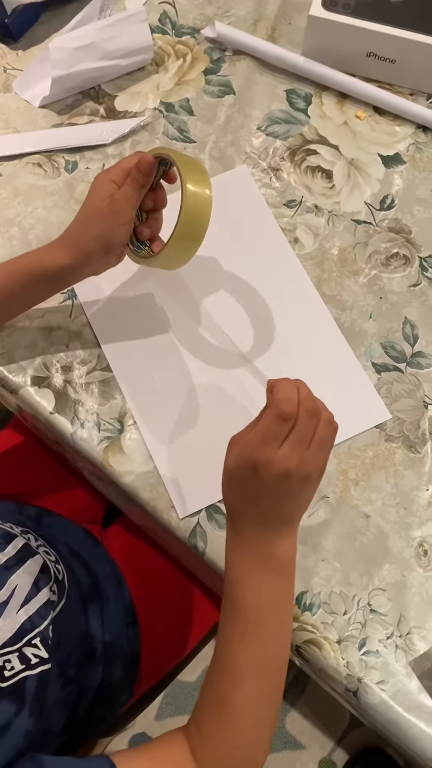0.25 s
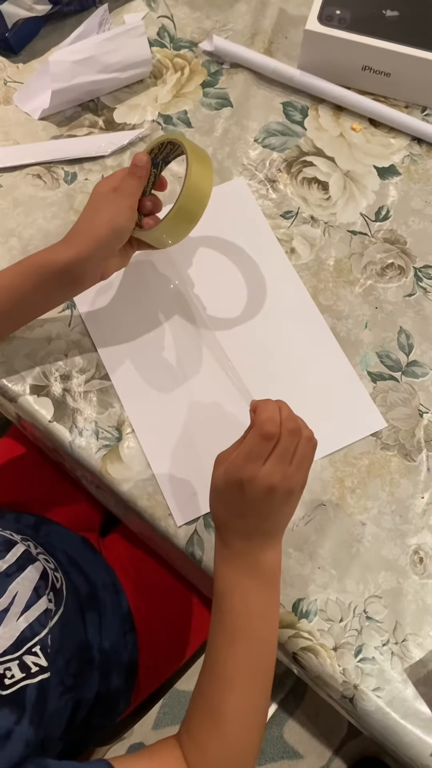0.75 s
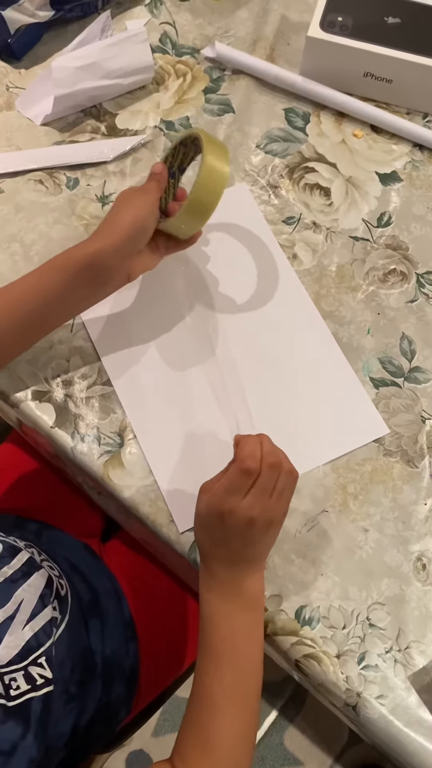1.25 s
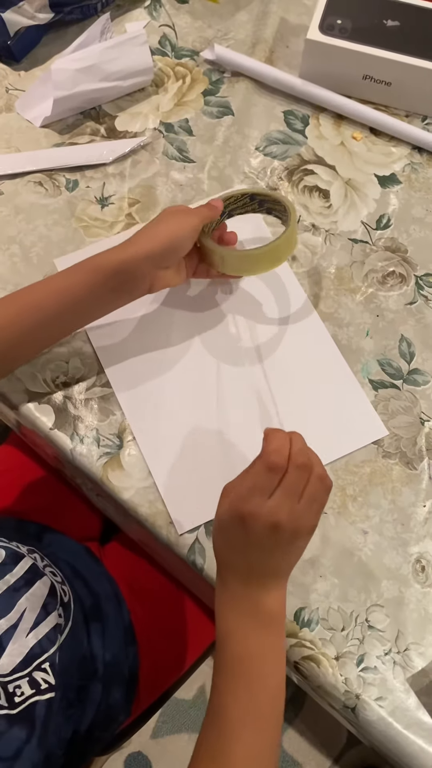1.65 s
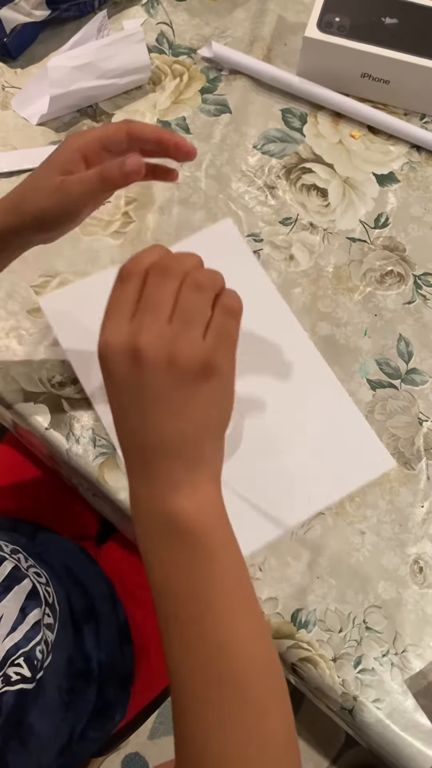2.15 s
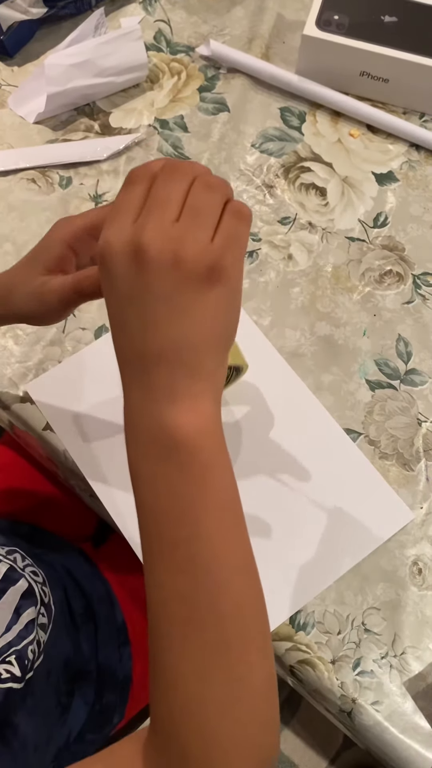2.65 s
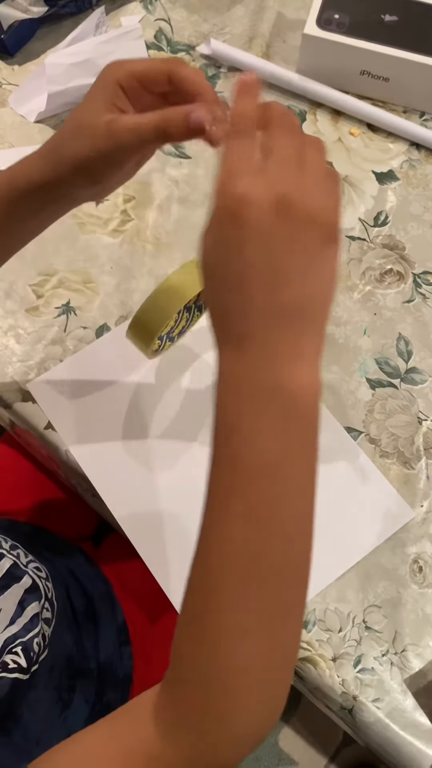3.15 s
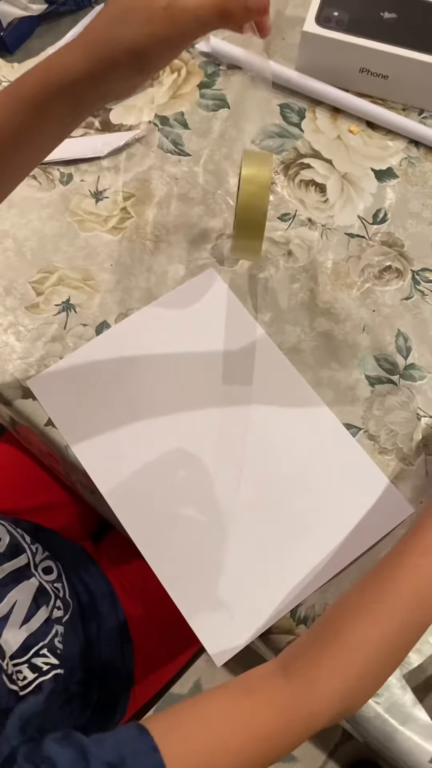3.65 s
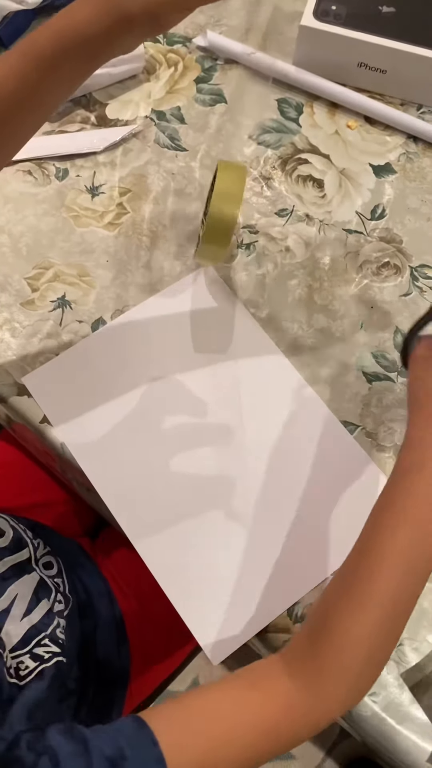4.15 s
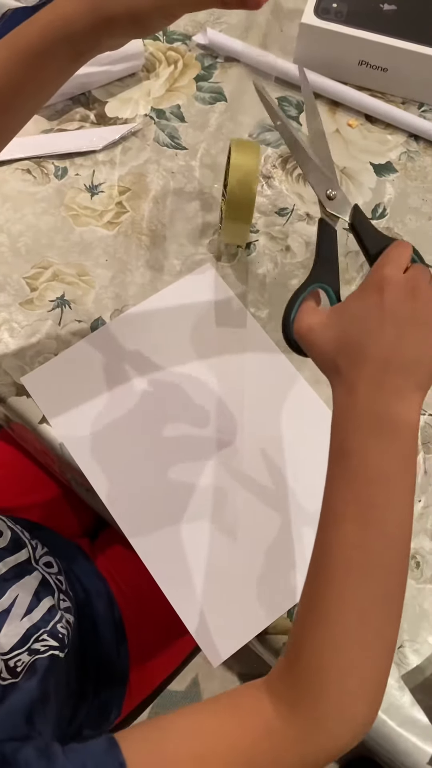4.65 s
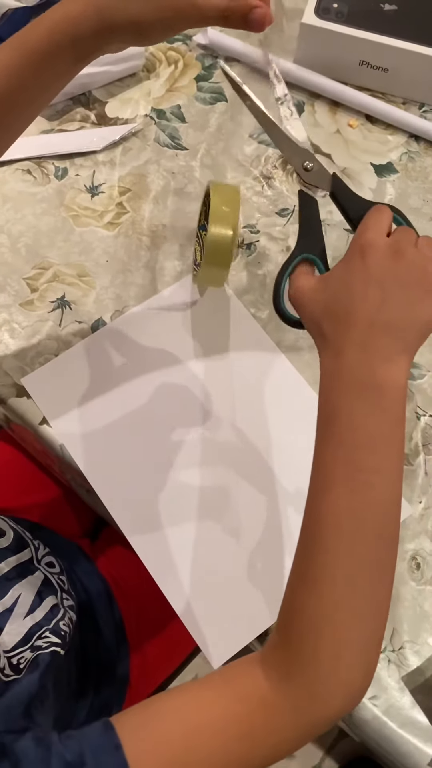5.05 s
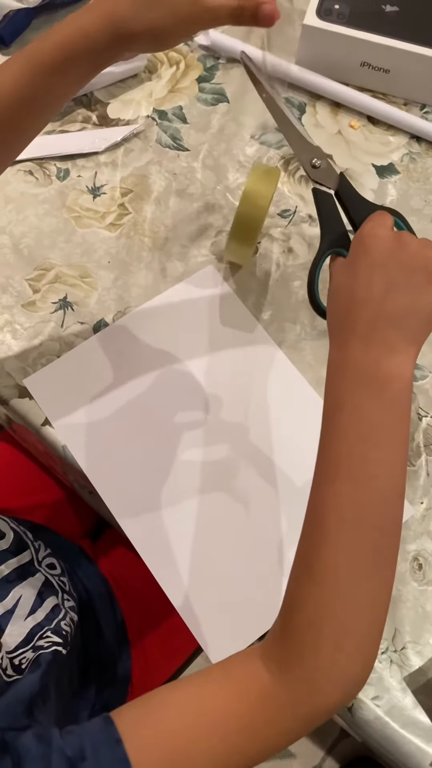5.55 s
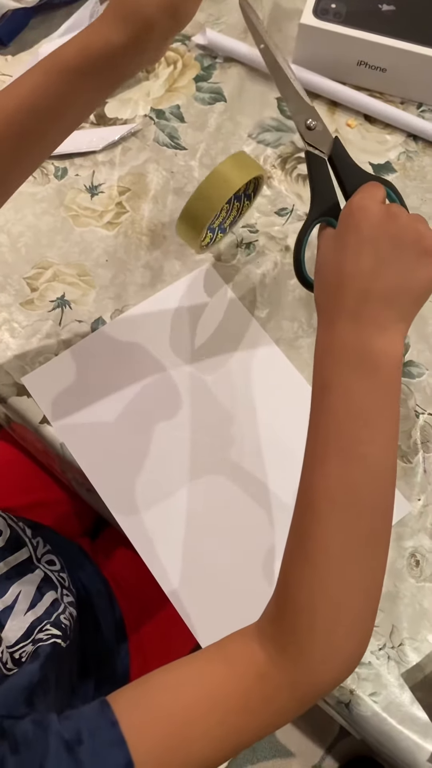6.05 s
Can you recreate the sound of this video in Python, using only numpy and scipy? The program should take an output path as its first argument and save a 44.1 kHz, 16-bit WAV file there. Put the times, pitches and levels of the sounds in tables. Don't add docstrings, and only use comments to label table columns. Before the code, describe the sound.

In a small quiet indoor room, heard close by a stereo phone, sticky tape is ripped from its cardboard roll. From 0 to 0.25 seconds the glue lets go in a dense stutter of very loud, dry, bright snaps with a slight hollow core knock. Separate jerks follow near 0.33, 0.44, 0.65 and 0.83, with a last strong group at 1.07-1.17 and tiny film crackles between. Everything then drops far quieter: soft rustling, a crisp tick at 1.63, and the roll knocking dully on the table at 2.0-2.1. Hands and paper rub gently until 3.5, with small ticks and a firmer woody knock at 3.59. A near-quiet stretch holds faint ticks and a brush at 4.4. Scissor clicks and short scuffs gather at 4.9-5.6, sharpest near 5.3 and 5.57, and one clear tick ends it at 6.24. A faint low drone wavers underneath.

```python
import sys
import numpy as np
from scipy import signal
from scipy.fft import rfft, irfft, next_fast_len
from scipy.io import wavfile
from scipy.ndimage import uniform_filter1d, map_coordinates

SR = 44100
rng = np.random.default_rng(int(sys.argv[2]) if len(sys.argv) > 2 else 0)


def wav_out(sig):
    wavfile.write(sys.argv[1], SR, np.round(np.clip(np.atleast_2d(sig).T, -1, 1) * 32767).astype(np.int16))


def ratio_of_db(decibels):
    return 10 ** (np.asarray(decibels, float) / 20)


N = 277389
TIME = np.arange(N) / SR
PAD = SR // 4


def unit(x):
    return x / np.sqrt(np.mean(x ** 2) + 1e-20)


def along(points, hz):
    f, v = np.transpose(points)
    return np.interp(np.log(hz + 1), np.log(f + 1), v)


def above(f, edge_hz):
    return 1 / (1 + (edge_hz / (f + 1)) ** 40)


def below(f, edge_hz, steepness=40):
    return 1 / (1 + (f / edge_hz) ** steepness)


def wobble(rate):
    knots = rng.standard_normal(int(N * rate / SR) + 4)
    return map_coordinates(knots, [np.arange(N) * rate / SR])


def filtered(x, response):
    m = next_fast_len(x.shape[-1] + SR // 8)
    spectrum = rfft(x, m) * response(np.fft.rfftfreq(m, 1 / SR))
    return irfft(spectrum, m)[..., :x.shape[-1]]


def modes(table):
    def response(f):
        total = 0
        for k, (c, w, db) in enumerate(table):
            total = total + (-1) ** k * ratio_of_db(db) * 1j * f * w / (c * c - f * f + 1j * f * w)
        return total
    return response


def noise(response):
    return unit(filtered(rng.standard_normal((2, N)), response))


def evened(burst):
    z = rfft(burst)
    smooth = np.sqrt(uniform_filter1d(np.abs(z) ** 2, size=15) + 1e-20)
    flat = irfft(z / np.sqrt(smooth), len(burst)) * (np.arange(len(burst)) < 2000)
    return flat * np.linalg.norm(burst) / np.linalg.norm(flat)


def bursts(times, peak_db, length_ms, rise_ms, spiky_db):
    out = np.zeros(N + 2 * PAD)
    t_ms = np.arange(2500) / SR * 1000
    snaps = rng.standard_normal((len(times), 2, len(t_ms)))
    for s, db, ms, (sign, size) in zip(times, peak_db, length_ms, snaps):
        shape = (1 - np.exp(-(t_ms / rise_ms) ** 2)) * np.exp(-t_ms / max(ms, .2))
        grains = unit(sign * ratio_of_db(spiky_db * size))
        out[PAD + round(s * SR):][:len(t_ms)] += ratio_of_db(db) * evened(shape * grains)
    return out


def through(s, db, hz, width, ms, rise_ms):
    t = np.arange(2200) / SR
    out = bursts([s], [db], [ms], rise_ms, spiky_db=2.5)
    start = PAD + round(s * SR)
    ring = t * np.exp(-1.5 * np.pi * width * t) * np.cos(2 * np.pi * hz * t)
    out[start:start + 4699] = np.convolve(out[start:start + 2500], ring / np.linalg.norm(ring))
    return out


# hz, density_db (per Hz)
TONE_COLOUR = [(15, -42), (25, -14), (98, -5), (170, -8), (390, -15), (640, -25), (2500, -47.5),
               (4200, -110)]
# time_s, level_db
TONE_LEVEL = [(0, -55.5), (.4, -59), (1.05, -63), (1.5, -68.5), (2.07, -65), (2.4, -66.5), (3.9, -65.5),
              (4.15, -69.5), (5.3, -65), (5.7, -69), (6.29, -67)]
# hz, width_hz, level_db
HUM = [(96, 6, -3.5), (145, 4, -1)]
# centre_s, half_width_s, level_db
DRONE_SWELLS = [
    (0.1, 0.27, -62),
    (1.68, 0.087, -62),
    (1.85, 0.085, -62.5),
    (2.04, .12, -59.5),
    (3.41, .08, -62.5),
    (3.9, 0.2, -70),
    (4.65, .15, -71.5),
    (5.39, .06, -69),
]


def background():
    swell = ratio_of_db(-77 + 3.4 * wobble(6))
    for s, half, db in DRONE_SWELLS:
        swell = swell + ratio_of_db(db) * np.exp(-((TIME - s) / half) ** 2)
    drone_hz, wander_rad = 56.7, 1.3
    drone = swell * np.sqrt(2) * np.sin(2 * np.pi * drone_hz * TIME + wander_rad * wobble(4.4))
    tone_db = np.interp(TIME, *np.transpose(TONE_LEVEL)) + 1
    tone = ratio_of_db(tone_db + 1.5 * wobble(5)) * noise(lambda f: ratio_of_db(along(TONE_COLOUR, f)))
    hum = ratio_of_db(-71.0) * noise(modes(HUM))
    hiss = ratio_of_db(-89.5) * noise(lambda f: (f > 900) * below(f, 12800))
    return drone + tone + hum + hiss


# hz, t60_s
REVERB_TIME = [(150, .55), (400, 0.66), (1000, 0.45), (3000, 0.54), (6000, 0.31), (9500, 0.24),
               (12500, 0.33), (16000, 0.75)]


def room(x):
    out, step = np.zeros((2, len(x) + SR)), SR // 8
    for start in range(0, len(x), step):
        piece = x[start:start + step]
        hz, t, z = signal.stft(rng.standard_normal((2, SR // 2)), SR, nperseg=256)
        late = ratio_of_db(-60 * t / along(REVERB_TIME, hz)[:, None])
        early = 2.2 * ratio_of_db(-60 * t / .05)
        tail = signal.istft(z * (late + early), SR, nperseg=256)[1]
        answer = signal.fftconvolve(piece[None], tail / np.linalg.norm(tail[0]), axes=1)
        out[:, start + 130:][:, :answer.shape[1]] += answer
        scatter = rng.standard_normal(200) * ratio_of_db(-60 * np.arange(200) / SR / .004)
        scatter = np.pad(scatter / np.linalg.norm(scatter), (0, tail.shape[1] - 200))
        out[1, start:][:answer.shape[1]] += ratio_of_db(1.5) * signal.fftconvolve(piece, scatter)
    return out[:, PAD:PAD + N]


# start_s, hold_s, level_db, brightness_db
SLIDING_STROKES = [(1.28, 0.083, -65.5, -10), (1.417, .14, -69, -6), (1.723, 0.33, -72, -7),
                   (2.016, 0.14, -64.5, 1.5), (2.2, 0.1, -66.5, -2), (2.508, 0.098, -65.5, -7.5),
                   (2.66, 0.36, -70.5, -6.5), (2.996, 0.21, -67, -13.5), (3.243, 0.14, -70.5, -4),
                   (3.383, 0.18, -68.5, -10.5), (3.78, 0.19, -82, -2.5), (4.299, 0.31, -84, -1.5),
                   (4.8, .08, -92.5, -4), (4.906, 0.11, -73.5, 5), (5.047, 0.051, -67.5, -12.5),
                   (5.18, 0.027, -72, 4), (5.258, 0.071, -67, -11), (5.5, 0.21, -86.5, -2.5)]


def strokes():
    attack_s, release_db_per_s = 0.016, 125
    still_rub_db, still_hiss_db = -94.5, -104
    start, hold, db, bright_db = np.transpose(SLIDING_STROKES)[..., None]
    knots = np.arange(0, N, 64)
    t = knots / SR - start
    shape = np.clip(t / attack_s, 0, 1) * ratio_of_db(-release_db_per_s * np.clip(t - hold, 0, None))
    gains = []
    for level, still in ((db, still_rub_db), (db + bright_db, still_hiss_db)):
        power = np.sum((shape * ratio_of_db(level)) ** 2, axis=0) + ratio_of_db(2 * still)
        gains.append(np.interp(np.arange(N), knots, np.sqrt(power)))
    return gains


def patchy(x, depth_db):
    z = signal.stft(x, nperseg=512)[2]
    field = uniform_filter1d(rng.standard_normal(z.shape[1:]), size=8, axis=0)
    field = uniform_filter1d(field, size=14, axis=1)
    return signal.istft(z * ratio_of_db(depth_db * unit(field) - 1.5), nperseg=512)[1][:, :N]


# hz, density_db (per Hz)
RUB_COLOUR = [(300, -25), (800, -6), (1500, -5), (2300, -3), (3400, 0), (6000, -1), (8000, -8),
              (12000, -30)]
# hz, density_db (per Hz)
HISS_COLOUR = [(3000, -30), (5500, -4.5), (7500, -1.5), (10000, -6.5), (12500, -4), (14000, -7),
               (15500, -7), (16500, -20)]


def rustle():
    rub_gain, hiss_gain = strokes()
    grain = ratio_of_db(0.56 * wobble(30) + 2.8 * wobble(400))
    rub = rub_gain * ratio_of_db(2.5) * noise(lambda f: ratio_of_db(along(RUB_COLOUR, f)))
    hiss = hiss_gain * ratio_of_db(7.5) * noise(lambda f: ratio_of_db(along(HISS_COLOUR, f)))
    return unit(grain) * patchy(rub + hiss, depth_db=2.0)


# start_s, level_db (peak),
# centre_hz, width_hz, length_ms
SHORT_SLIDES = [(1.99, -38, 3030, 6000, 9.8), (2.078, -43.5, 2490, 6100, 11), (2.545, -41, 3060, 6100, 11),
                (3.118, -41, 3970, 7130, 11.7), (3.855, -57.5, 2320, 1474, 15),
                (4.396, -48, 2400, 700, 8.4), (4.918, -52, 5530, 2015, 26), (4.93, -47, 10600, 3510, 23.7),
                (4.4, -48, 10600, 5000, 11), (5.075, -37.5, 4514, 7000, 7.8),
                (5.315, -40, 2990, 5000, 8.56), (3.545, -45.5, 2100, 500, 1.94),
                (3.567, -53, 2488, 600, 2.5), (3.856, -55, 5540, 4000, 14),
                (5.527, -41.5, 15300, 1500, 2.9), (5.581, -52.5, 4510, 3996, 10.6)]


def scuffs():
    return sum(through(s, db + 8.5, hz, width, ms, rise_ms=1.84 * ms)
               for s, db, hz, width, ms in SHORT_SLIDES)


# start_s, level_db (peak), pitch_hz, width_hz, length_ms
TABLE_KNOCKS = [
    (2.003, -38.5, 534, 148.5, 2.7),
    (2.004, -45, 301, 150, 4.7),
    (2.027, -49.5, 193, 151, 5.2),
    (2.091, -42.5, 480, 250, 2.7),
    (2.095, -50, 300, 149, 3.6),
    (2.556, -45, 710, 247, 3),
    (3.586, -37.5, 622, 174, 2.25),
    (3.591, -43, 381, 200, 2.6),
    (3.6, -49.5, 122.6, 150.7, 12.5),
]


def knocks():
    return sum(through(s, db + 5.5, hz, min(width, 0.0032 * hz ** 1.9), ms, rise_ms=1.14)
               for s, db, hz, width, ms in TABLE_KNOCKS)


# start_s, level_db (peak), low_db, bright_db
CONTACT_TICKS = [(1.466, -41, -14, -15.5), (1.6261, -28.5, -26.5, -1), (1.9898, -42.5, -15, -17),
                 (1.9982, -32, -2, -26), (2.005, -60.5, -4, -27), (2.0227, -32, -28, -6),
                 (2.0297, -35, -1, -2.5), (2.0816, -40.5, -3, -8.5), (2.4981, -43.5, -13, -19.5),
                 (2.5588, -37.5, -4.5, -7.5), (2.9215, -42.5, -10, -29), (2.9462, -47, -4, -20.5),
                 (3.013, -33.5, -5, -31), (3.1353, -39.5, -16.5, -8), (3.42, -37.5, -12.5, -17.5),
                 (3.7105, -48.5, -5.5, -7.5), (3.8833, -50.5, -8.5, -10.5), (4.0987, -51, -23.5, -22.5),
                 (4.5209, -52.5, -11.5, -20), (4.8028, -42, -15, -15), (5.099, -45, -3.5, -4),
                 (5.1722, -45, -0.5, -20), (5.2963, -36, -14.5, -16), (5.312, -29.5, -6, -4),
                 (5.3287, -32, -2, -12.5), (5.5717, -29.5, -38, -17.5), (5.7342, -45, -2, -12),
                 (5.9677, -48.5, -19.5, -27), (6.2363, -24, -26.5, -7.5)]
# start_s, level_db (peak)
FILM_CRACKLES = [(0.5947, -42.5), (0.6102, -56), (0.6208, -59), (.632, -51), (0.6358, -45), (1.0138, -48),
                 (1.0188, -49), (1.028, -52), (1.0408, -48), (2.509, -57.5), (3.459, -56), (3.9257, -65.5),
                 (3.9532, -65), (4.3045, -70), (4.4168, -62), (4.7846, -60), (4.9144, -64.5),
                 (5.0524, -55.5), (5.0862, -50), (5.212, -61.5), (5.247, -64), (5.276, -54),
                 (5.5077, -68.5), (5.531, -61.5), (5.5352, -65.5)]


def ticks():
    length_ms = 1.3
    contacts = [(*row, length_ms) for row in CONTACT_TICKS]
    crackles = [(*row, -23, 1.5, length_ms) for row in FILM_CRACKLES]
    s, db, low_db, bright_db, ms = np.transpose(contacts + crackles)
    low = bursts(s, db + low_db + 25.5, 0.34 * ms, rise_ms=0.97, spiky_db=2.5)
    middle = bursts(s, db + 4.5, ms, rise_ms=.4, spiky_db=6.0)
    bright = bursts(s, db + bright_db + 11.5, ms, rise_ms=0.14, spiky_db=4.5)
    low = filtered(low, modes([(700, 270, -1.8), (1177, 1300, 0.31)]))
    middle = filtered(middle, modes([(2400, 530, 1.7), (5000, 1100, -2.0)]))
    bright = filtered(bright, modes([(7453, 16000, -0.5), (13000, 5000, 2.5), (16000, 2000, -4.0)]))
    return low + middle + bright


# start_s, level_db (peak), core_db (knock), length_ms
RELEASES = [(0.0185, -7.5, -30, 1.23), (0.03, -5, -25, 0.96), (0.0464, -4.5, -36.5, 1.6),
            (0.0594, -4, -26, 0.92), (0.0732, -4, -24.5, 0.97), (0.0878, -6, -21.5, 1.34),
            (0.097, -20.5, -19.5, 0.57), (0.1438, -7, -24, 1.97), (0.2308, -4, -19.5, 0.91),
            (0.2343, -8.5, -19, 3), (0.2417, -7.5, -21.5, 1.8), (0.2454, -11.5, -21.5, 2.4),
            (0.2486, -6.5, -20, 1.48), (0.3274, -0.5, -23, 1.54), (0.3372, -6.5, -16.5, 2.5),
            (0.4328, -3.5, -22, 1.63), (0.436, -6, -18, 1.5), (0.445, -9, -15, 1.9), (0.6495, -4, -22, 1.6),
            (0.8275, -7, -21.5, 2.37), (0.84, 0, -17.5, 1.23), (1.0705, 0.5, -19.5, 1.19),
            (1.0838, -3, -17, 1.03), (1.097, -5.5, -24, 1.8), (1.1702, -5.5, -22, 1.3)]
EARLIER_RELEASE = (-.06, -9, -22, 3)
# start_s, level_db (peak)
SECOND_RELEASES = [(0.0206, -12), (.033, -11.5), (0.0493, -7.5), (0.0622, -10), (.0755, -5.5),
                   (0.0797, -13.5), (0.0898, -7), (.3412, -7.5), (.653, -12), (0.659, -4.5), (1.0747, -14),
                   (1.1736, -21)]
# hz, width_hz, level_db
FILM_MODES = [(1210, 380, -18.5), (2480, 610, 6), (3960, 180, -3.5), (5400, 1700, 5.5), (7600, 1900, 4.5),
              (9500, 900, 4.5), (13817, 12000, -4), (16956, 460, -4)]
# hz, width_hz, level_db
CORE_MODES = [(139.9, 31, -9.5), (238.2, 60, -5.5), (283, 80, -7.5), (664, 350, -3.5), (947, 420, -1),
              (1295.7, 350, -1.5)]


def tape():
    second = [(s, db, -22.5 + 11 * s, 2.1) for s, db in SECOND_RELEASES]
    s, db, core_db, ms = np.transpose(list(RELEASES) + [EARLIER_RELEASE] + second)
    slack = s > 1.0
    crack = bursts(s, db + 2 + 1.5 * slack, .75 * ms, rise_ms=.6, spiky_db=6.5)
    film = bursts(s, db + 3.0 - 2 * slack, ms, rise_ms=0.75, spiky_db=1.5)
    core = bursts(s, db + core_db + 28.5, 1.23 * ms, rise_ms=0.93, spiky_db=1.5)
    strain = bursts(s - .011, db - 24.0, 6 * ms, rise_ms=1.6, spiky_db=3.0)
    crack = filtered(crack, modes(FILM_MODES[3:]))
    film = filtered(film, modes(FILM_MODES[:3]))
    core = filtered(core, modes(CORE_MODES))
    core = filtered(core, lambda f: (1j * f / (130 + 1j * f)) ** 2)
    strain = filtered(strain, lambda f: modes([(2500, 700, 0)])(f) ** 2)
    return crack + film + core + strain


# hz, likeness (0-1)
PORT_LIKENESS = [(60, 1), (300, 0.73), (700, 0.33), (1500, .8), (3500, .65), (5500, .9), (6800, 0.91),
                 (16000, 0.9)]


def scene():
    near = tape() + ticks() + knocks() + scuffs()
    near = filtered(near, lambda f: below(f, 17500))

    def room_colour(f):
        return (1 - 0.22 * modes([(2500, 700, 0)])(f)) * ratio_of_db(-8 * above(f, 12900))

    def diffuse_colour(f):
        dip = ratio_of_db(-7.5 * (above(f, 12900) - above(f, 15000)))
        return dip * below(f, 15850, steepness=120)

    def spread(f):
        turn = np.arccos(np.clip(along(PORT_LIKENESS, f), -1, 1)) / 2
        return np.array([np.cos(turn), np.sin(turn)])

    reverb = filtered(ratio_of_db(-9.0) * room(near), room_colour)
    diffuse = filtered(reverb + rustle() + background(), diffuse_colour)
    pair = diffuse + [[1], [0]] * near[PAD:PAD + N]
    common, odd = filtered(pair, spread)
    return np.array([common + odd, common - odd])


def top_cut(x):
    return signal.sosfilt(signal.butter(12, 17090, fs=SR, output="sos"), x)


# hz, lead_rad
PORT_LEAD = [(0, 0), (2700, .2), (4100, .8), (4900, .3), (5500, .8), (6200, 2.1), (7400, 3.14),
             (16700, 12.56)]
# hz, difference_db
PORT_TILT = [(60, -.5), (150, -1.5), (450, -3.5), (1200, -.5), (2000, -1), (3000, -3), (5500, 0)]


def record(dry):
    def half(f):
        return ratio_of_db(along(PORT_TILT, f) / 2) * np.exp(.5j * np.interp(f, *np.transpose(PORT_LEAD)))

    ports = filtered(dry, lambda f: np.array([half(f), 1 / half(f)]))
    ports = filtered(np.clip(ports, -.96, .96), lambda f: below(f, 16350, steepness=60))
    return top_cut(np.clip(ports, -1, 1))


dry = scene()
out = record(dry)
wav_out(out)
```